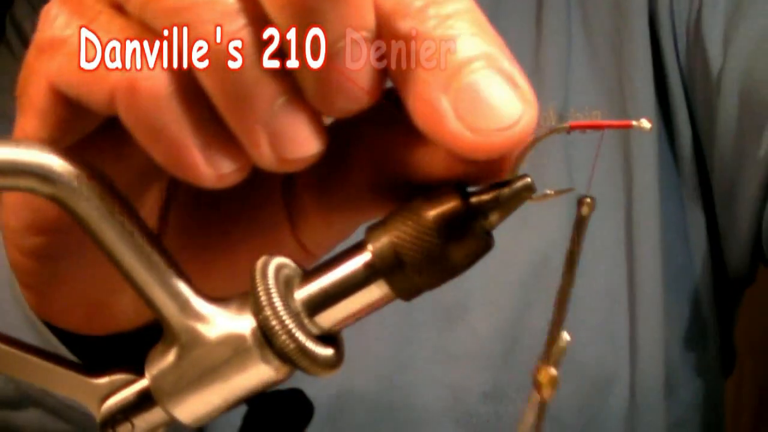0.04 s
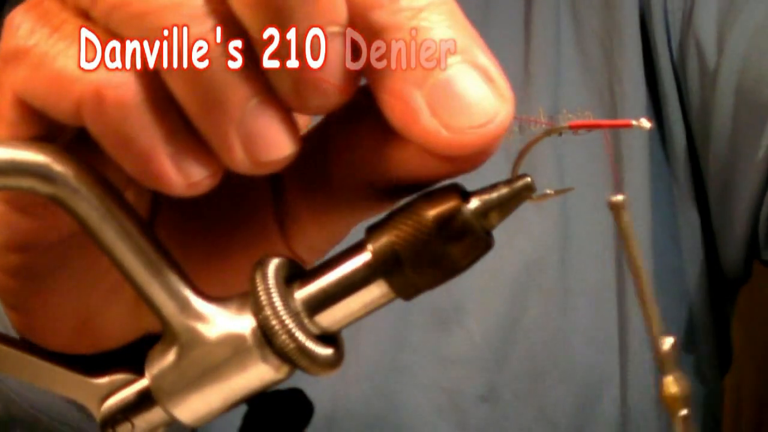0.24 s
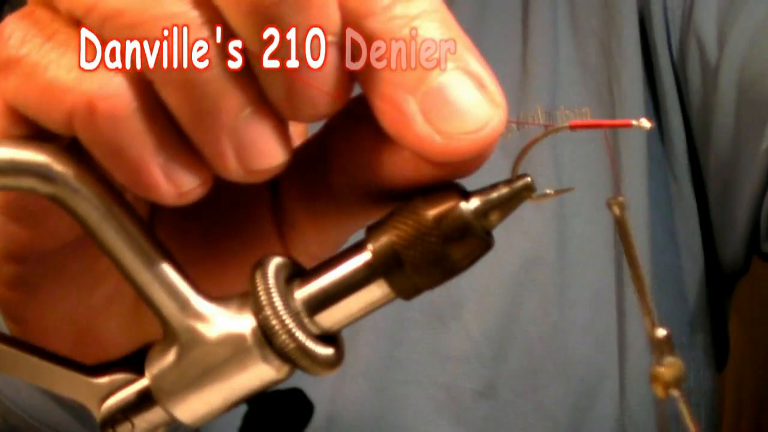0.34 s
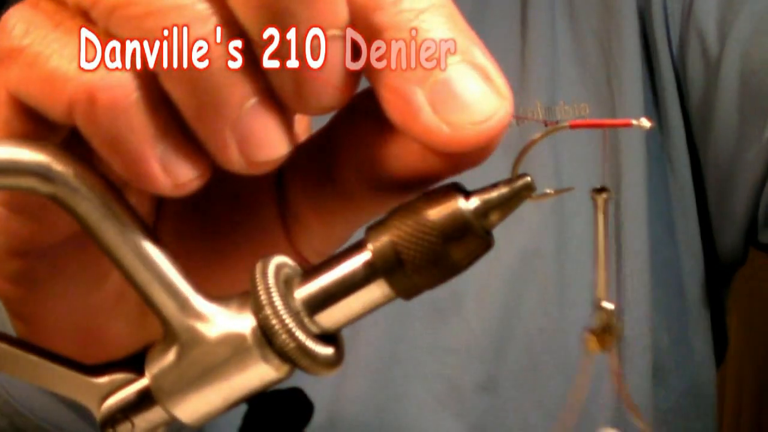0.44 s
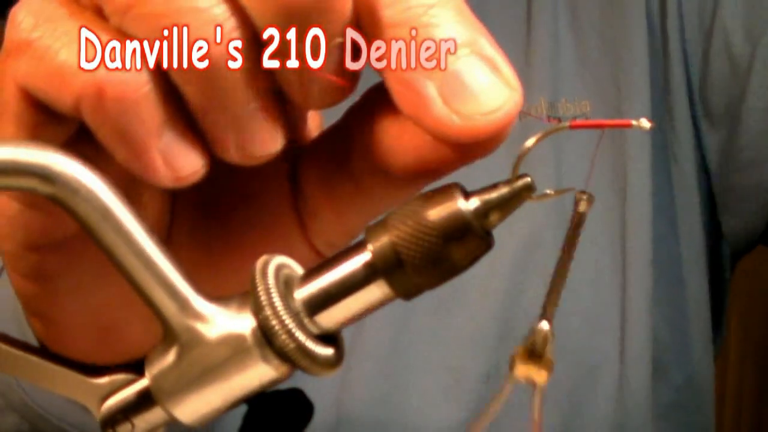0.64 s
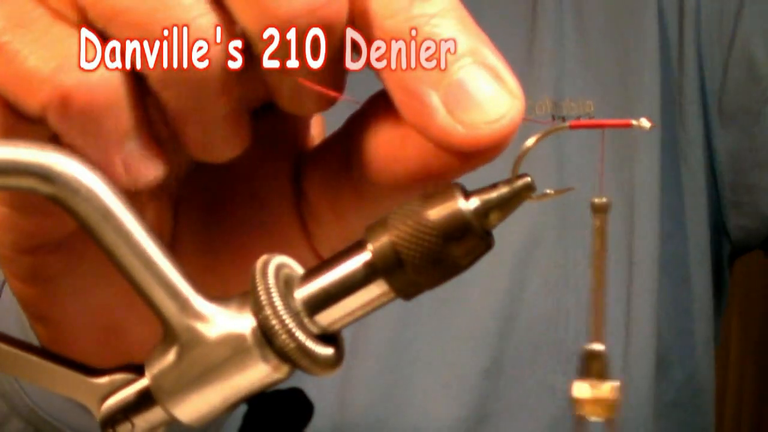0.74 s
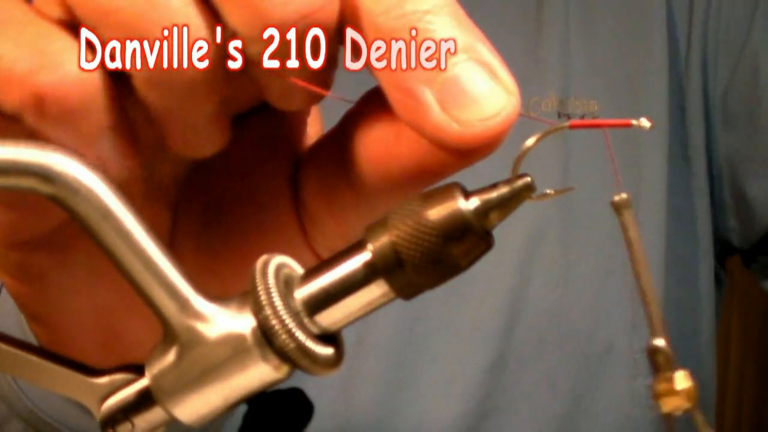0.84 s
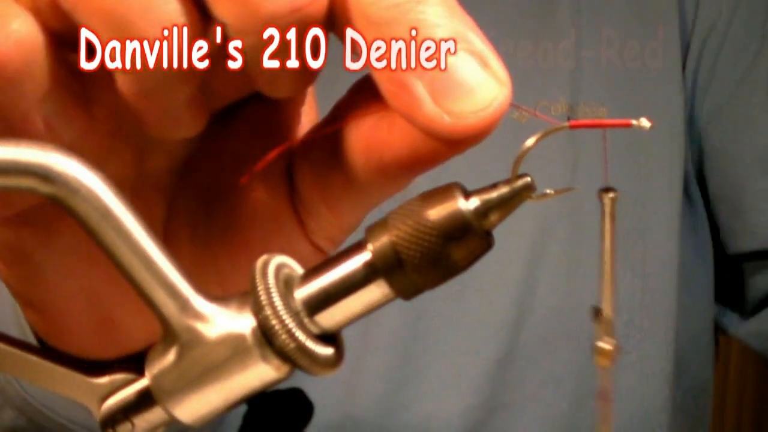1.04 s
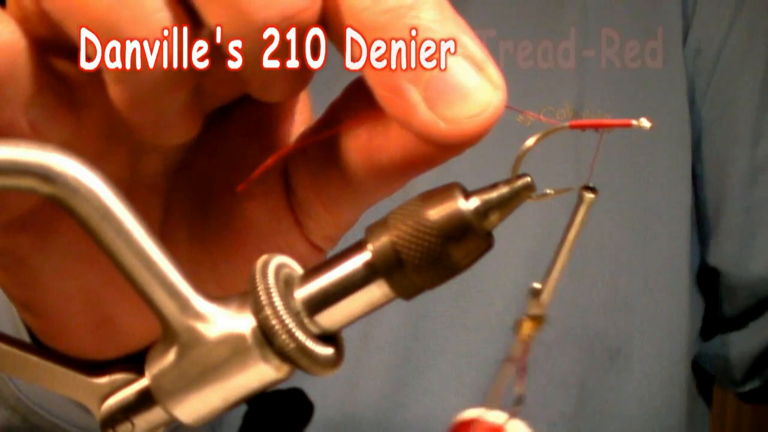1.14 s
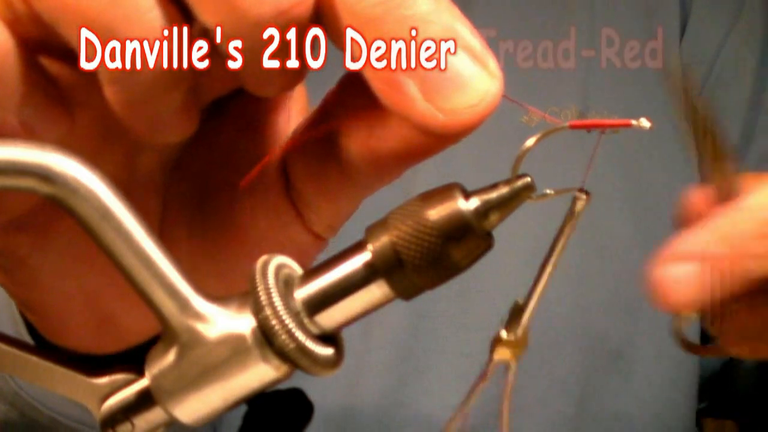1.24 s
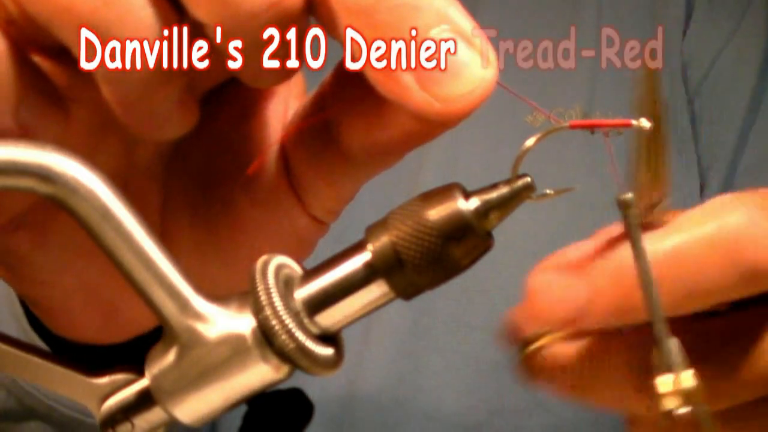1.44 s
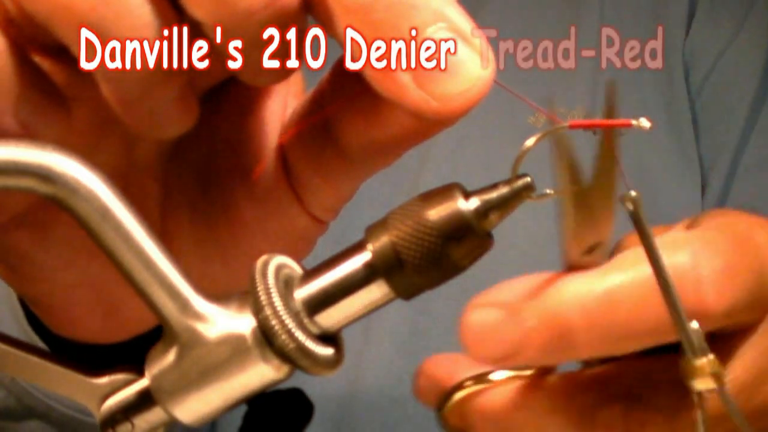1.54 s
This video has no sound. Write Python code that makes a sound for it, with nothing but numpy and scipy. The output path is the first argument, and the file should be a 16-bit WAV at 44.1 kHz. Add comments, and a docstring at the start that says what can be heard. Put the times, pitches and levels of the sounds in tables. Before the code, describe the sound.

Thread rasps, small scissors snap shut and a tool clacks, close by in a quiet room.

```python
"""Thread rasps over a soft bump of the hand, close by, at a fly-tying bench in a quiet room.
Small scissors slide with stick-slip friction and cut in a bright snap of rapid impulses; the tool
clacks three times, and the bench rings and reflects each impact. Then come only faint rustles of
fingers, grazes on the bobbin holder and small tinks of steel, over a fan, mains hum and hiss."""
import sys
import numpy as np
from scipy import signal
from scipy.fft import rfft, irfft
from scipy.io import wavfile

SR = 44100
rng = np.random.default_rng(int(sys.argv[2]) if len(sys.argv) > 2 else 0)


def to_wav(sig):
    """Store sig (one row per channel, or 1-D mono) as 16-bit WAV at the path in sys.argv[1].

    Samples outside -1..1 are clipped; the rate is SR.
    """
    pcm = np.clip(np.atleast_2d(sig), -1, 1) * 32767
    pcm = np.round(pcm).astype(np.int16)
    wavfile.write(sys.argv[1], SR, pcm.T)  # frames by channels


N = 70560
T, HZ = np.arange(N) / SR, np.fft.rfftfreq(2 * N, 1 / SR)
BITE_HZ, THUMP_HZ = 4030, 796  # bite is a treble shelf, thump a bass shelf

# left-right coherence of reflections and finger rustle: f/Hz, correlation
DIFFUSE_COHERENCE = [(100, 1), (600, 0.88), (2000, 0.89), (3500, 1), (6000, 0), (15000, 0)]
# left-right coherence of room noise and hand bumps: f/Hz, correlation
AMBIENT_COHERENCE = [(50, 0.93), (400, 0.89), (1000, 0.43), (3000, 0.19), (12000, 0.039)]


def amp(db):
    """Amplitude ratio of a level in decibels."""
    return 10 ** (np.asarray(db) / 20)


def unit(x):
    """Normalisation to rms 1."""
    return x / np.sqrt(np.mean(x ** 2) + 1e-20)


def curve(points, hz=HZ):
    """Interpolation of a table on a log-frequency axis."""
    f, value = np.transpose(points)
    return np.interp(np.log(hz + 1), np.log(f + 1), value)


def causal(db):
    """Minimum-phase response: the Hilbert transform ties phase to log gain."""
    log_gain = np.log(amp(np.r_[db, db[-2:0:-1]]))
    return np.exp(np.conj(signal.hilbert(log_gain)))[:len(HZ)]


def filtered(x, response):
    """Convolution as a product of spectra."""
    return irfft(rfft(x, 2 * N) * response)[..., :N]


def delay(seconds):
    """Pure delay: phase lag proportional to frequency."""
    return np.exp(-2j * np.pi * HZ * seconds)


def above(hz, order=6):
    """High-pass shape: a smooth step from 0 to 1 around hz."""
    return 1 - 1 / (1 + (HZ / hz) ** order)


def resonance(hz, peak_db, half_width_hz):
    """Resonance peak: a bell curve in decibels."""
    return peak_db / (1 + ((HZ - hz) / half_width_hz) ** 2)


def stereo_noise(coherence):
    """Partly coherent white noise: sum and difference of two independent signals."""
    a, b = rng.standard_normal((2, N))
    correlation = np.clip(curve(coherence), -1, 1)
    mid = filtered(a, np.sqrt((1 + correlation) / 2))
    side = filtered(b, np.sqrt((1 - correlation) / 2))
    return np.array([mid + side, mid - side])


def swell(start, rise, fade):
    """Envelope of linear growth and exponential decay."""
    return np.clip((T - start) / rise, 0, 1) * np.exp(-np.maximum(T - start - rise, 0) / fade)


def ring(modes):
    """Free vibration: a sum of damped normal modes."""
    return sum(amp(db - 60 * T / t60) * np.sin(2 * np.pi * hz * T) for hz, db, t60 in modes)


def impulse(start, spectrum_db):
    """A brief contact: one minimum-phase pulse of the given spectrum."""
    return irfft(delay(start) * causal(spectrum_db))[:N]


def impacts(hits, spectrum):
    """Superposed impulses, each with its own share of bite and thump."""
    treble, bass = above(BITE_HZ), 1 - above(THUMP_HZ, order=2)
    return sum(impulse(start, db + curve(spectrum) + bite * treble + thump * bass)
               for start, db, bite, thump in hits)


def slips(per_second=3500, spread_db=5):
    """Stick-slip friction: a dense random train of tiny slips of uneven size."""
    signs = np.sign(rng.standard_normal(N)) * (rng.random(N) < per_second / SR)
    return signs * amp(spread_db * np.minimum(rng.exponential(1, N), 3))


def diffuse_tail(decay, rise_s):
    """Diffuse reflections of energy 1, each band decaying with its own reverberation time."""
    hz, t, bands = signal.stft(stereo_noise(DIFFUSE_COHERENCE), SR, nperseg=256)
    damping = amp(-60 * t / curve(decay, hz)[:, None])
    tail = signal.istft(bands * damping, SR, nperseg=256)[1][:, :N]
    return unit(tail * np.minimum(T / rise_s, 1)) / np.sqrt(N)


def bench(x, scatter_db, echoes=(), modes=(), room_db=-7.5):
    """Direct sound, early reflections, modes and reverberation add at two microphone ports."""
    # decay of nearby scattering: f/Hz, T60/s
    scatter_decay = [(200, 0.059), (3000, 0.057), (14000, 0.028)]
    # reverberation of the room: f/Hz, T60/s
    room_decay = [(100, 0.98), (500, 0.31), (1200, 0.33), (2500, 0.37), (5000, 0.363), (14000, 0.12)]
    # level difference between the ports: f/Hz, left minus right/dB
    balance = [(100, -1.5), (550, -1), (1100, -1.5), (2200, -0.9), (5000, 1.2), (13000, 4)]
    early = 1 + sum(amp(db) * delay(lag) / (1 + 1j * HZ / cutoff) for lag, db, cutoff in echoes)
    scatter = diffuse_tail(scatter_decay, rise_s=0.001)
    room = diffuse_tail(room_decay, rise_s=0.004)
    late = ring(modes) + amp(scatter_db) * (scatter + amp(room_db) * room)
    left_db, right_lag_s = curve(balance) / 2, 2.3 / SR
    ports = np.array([amp(left_db), amp(-left_db) * delay(right_lag_s)])
    return filtered(x, (early + rfft(late, 2 * N)) * ports)


def background(noise_db=-55, waver_depth=0.35, waver_hz=8.7):
    """Broadband room noise, with fan and mains tones under random narrowband modulation."""
    # spectrum of room noise and hiss: f/Hz, relative level/dB
    spectrum = [(20, -19), (45, 5), (70, 8.5), (140, 13.5), (230, 3), (320, 2.5), (400, 14.5), (480, 3.5),
                (620, -1.5), (1000, -4), (2500, -6.5), (5000, -9), (9000, -7.5), (15500, -9)]
    # tones of fan and mains: f/Hz, level/dB
    hum = [(59.2, -64.5), (119, -67.5), (321, -69), (391, -60.5), (463, -70)]
    sound = amp(noise_db) * unit(filtered(stereo_noise(AMBIENT_COHERENCE), amp(curve(spectrum))))
    slow = 1 - above(waver_hz, order=2)
    for hz, db in hum:
        in_phase, quadrature = waver_depth * unit(filtered(rng.standard_normal((2, N)), slow))
        phase = 2 * np.pi * (hz * T + rng.random())
        sound += amp(db) * unit((1 + in_phase) * np.cos(phase) + quadrature * np.sin(phase))
    return sound


def rustle(strokes, spectrum, coherence):
    """Soft contact: coloured noise, amplitude-modulated by each stroke."""
    noise = unit(filtered(stereo_noise(coherence), amp(curve(spectrum))))
    return noise * sum(amp(db) * swell(start, rise, fade) for start, rise, fade, db in strokes)


def hands():
    """Light friction of fingers gives a hiss; soft impacts of the hand give low thuds."""
    # fingers brushing thread and cloth: t/s, rise/s, fade/s, level/dB
    brushes = [(.575, 0.04, 0.021, -54.5), (.96, 0.035, 0.093, -55), (1.24, 0.033, 0.15, -60),
               (1.48, 0.027, 0.015, -48.5)]
    # spectrum of a brush: f/Hz, relative level/dB
    hiss = [(500, -5), (4000, -3), (8500, 7.5), (12000, 5), (15500, 2)]
    # hand bumping the bench: t/s, rise/s, fade/s, level/dB
    bumps = [(0, 0.00057, 0.07, -38), (.312, 0.024, 0.04, -41)]
    # spectrum of a bump: f/Hz, relative level/dB
    thud = [(30, -40), (70, 10.5), (100, -1), (140, 18), (210, -2.5), (350, 9.5), (900, -17)]
    return rustle(brushes, hiss, DIFFUSE_COHERENCE) + rustle(bumps, thud, AMBIENT_COHERENCE)


def holder_grazes():
    """Friction excites the bobbin holder; each point of contact favours another mode."""
    # fingers grazing the holder: t/s, rise/s, fade/s, level/dB, favoured f/Hz
    grazes = [(1.002, 0.014, 0.025, -54.5, 1000), (1.128, 0.0099, 0.015, -60.5, 1360),
              (1.248, .028, 0.016, -53.5, 1780)]
    # modes of the holder: f/Hz, relative level/dB, T60/s
    modes = [(1015, -11.5, 0.07), (1366, 1.5, 0.023), (1760, -1, 0.035), (2147, 3.5, 0.024),
             (2610, 3.5, 0.024)]
    rub = filtered(slips(), rfft(ring(modes), 2 * N))
    sound = np.zeros(N)
    for start, rise, fade, db, hz in grazes:
        favour = amp(resonance(hz, peak_db=9.5, half_width_hz=130))
        sound += amp(db) * swell(start, rise, fade) * unit(filtered(rub, favour))
    return sound


def metal_tick(start_s=1.0743):
    """One tiny impulse on metal that dies at once."""
    # spectrum of the tick: f/Hz, level/dB
    spectrum = [(500, -62), (1900, -29), (2620, -16), (3300, -20.5), (15000, -48)]
    return impulse(start_s, curve(spectrum))


def steel_tinks():
    """Light impacts of steel on steel excite the same damped modes each time."""
    # touches: t/s, level/dB
    touches = [(1.492, -52), (1.5035, -44.5), (1.519, -54.5)]
    # modes of the steel: f/Hz, relative level/dB, T60/s
    modes = [(1680, -6.5, 0.018), (3586, 0, 0.041), (11900, -21, 0.032)]
    strikes = sum(amp(db) * delay(start) for start, db in touches)
    return bench(filtered(ring(modes), strikes), scatter_db=-4.5)


def contact(db, bite, hz):
    """Response in decibels of one point of contact: level, bite and one resonance."""
    return db + bite * above(BITE_HZ) + resonance(hz, peak_db=10, half_width_hz=85)


def thread_rasps():
    """Stick-slip friction of thread and blades, with a few impulsive catches."""
    # sliding strokes: t/s, rise/s, fade/s, relative level/dB, bite/dB, resonance f/Hz
    strokes = [(.001, 0.0012, 0.027, -44, 1.5, 1770), (0.026, 0.0024, 0.0068, -38.5, -28, 1105),
               (.057, 0.00071, 0.025, -36, -1, 1190), (0.089, 0.003, 0.018, -42.5, -4, 830),
               (0.107, 0.0045, 0.012, -41.5, -5.5, 2000), (0.12, 0.0037, 0.005, -45, -8, 1840),
               (0.202, 0.016, .01, -38.5, 4, 2400), (0.221, 0.016, 0.0078, -28.5, 6.5, 1900),
               (0.296, 0.015, 0.0062, -31.5, 6.5, 2380)]
    # sharp catches of the thread: t/s, relative level/dB, bite/dB, resonance f/Hz
    catches = [(.0575, -7, -5, 3750), (.0875, -9.5, -5.5, 3400), (0.0895, -12, -25, 630),
               (.2237, -10.5, -2, 2300)]
    # spectrum of the friction: f/Hz, relative level/dB
    spectrum = [(80, -33), (250, -12), (410, 9.5), (590, 2.5), (710, -9.5), (810, 3.5), (950, -7),
                (1200, 1), (1550, -2), (2000, 0.5), (3000, -2), (3700, -3), (4500, -12.5), (9000, -12.5),
                (15000, -21)]
    rub = unit(filtered(slips(), causal(curve(spectrum))))
    sliding = sum(filtered(rub * swell(start, rise, fade), causal(contact(*point)))
                  for start, rise, fade, *point in strokes)
    catching = sum(impulse(start, curve(spectrum) + contact(*point)) for start, *point in catches)
    return bench(sliding / 2 + catching, scatter_db=3)


def tool_clacks(gain_db=8):
    """Three impacts excite the modes of tool and bench and reflect from nearby surfaces."""
    # clacks: t/s, relative level/dB, bite/dB, thump/dB
    hits = [(.31321, 2.5, 1, -11), (.35, -7.5, -8, -5.5), (.368, -16.5, -3, 5)]
    # spectrum of a clack: f/Hz, relative level/dB
    spectrum = [(40, -34), (130, -5.5), (220, -14.5), (420, 9), (780, 5), (1080, 4.5), (1600, -6),
                (2250, -1), (2750, -3.5), (3500, -10), (4500, -19), (8000, -21.5), (14000, -23.5),
                (15600, -30)]
    # early reflections: delay/s, gain/dB, low-pass f/Hz
    echoes = [(.00096, -9, 8100), (.0015, 5, 453), (.00335, 12, 400), (.00374, 9.5, 2200)]
    # modes of tool and bench: f/Hz, relative level/dB, T60/s
    modes = [(399.5, -33, 0.18), (527, -37.5, 0.14), (786.6, -30.5, 0.1), (1015, -54, 0.49),
             (1090, -29, 0.038), (1316, -30.5, 0.094), (2272, -42.5, 0.18), (12400, -48, .13)]
    return bench(amp(gain_db) * impacts(hits, spectrum), scatter_db=4.5, echoes=echoes, modes=modes)


def scissor_cut(gain_db=13):
    """Blades chatter through thread: five impulses fuse into one snap and ring the scissors."""
    # chatter of the blades: t/s, relative level/dB, bite/dB, thump/dB
    chatter = [(.2396, -1.5, 4.5, -5), (.2413, -3, -18, 7), (.2436, 3.5, -9, 3.5), (.2457, -6, -1, -11),
               (.2478, -9.5, -4, -8.5)]
    # spectrum of the snap: f/Hz, relative level/dB
    spectrum = [(40, -40), (180, -18.5), (310, 2.5), (470, -1), (790, -7.5), (1030, -6), (1600, -15),
                (2000, -6), (3000, -9.5), (3900, -14.5), (4500, -20.5), (5400, -12.5), (6600, -18),
                (14000, -13.5), (15300, -58)]
    # modes of the closing scissors: f/Hz, relative level/dB, T60/s
    modes = [(2190, -63, 0.2), (3440, -40, 0.0406)]
    return bench(amp(gain_db) * impacts(chatter, spectrum), scatter_db=0, modes=modes, room_db=-12.5)


def scene():
    """Superposition of scissors, thread, hands, bobbin holder and the quiet room."""
    work = scissor_cut() + tool_clacks() + thread_rasps() + steel_tinks() + hands()
    holder = bench(holder_grazes() + metal_tick(), scatter_db=-7.5)
    return work + holder + background()


def record(dry):
    """Band limiting by a linear-phase low-pass filter."""
    cutoff_hz = 15800
    lowpass = signal.firwin(511, cutoff_hz, window=("kaiser", 9), fs=SR)
    return signal.oaconvolve(dry, lowpass[None], "same")


dry = scene()
out = record(dry)
to_wav(out)
```